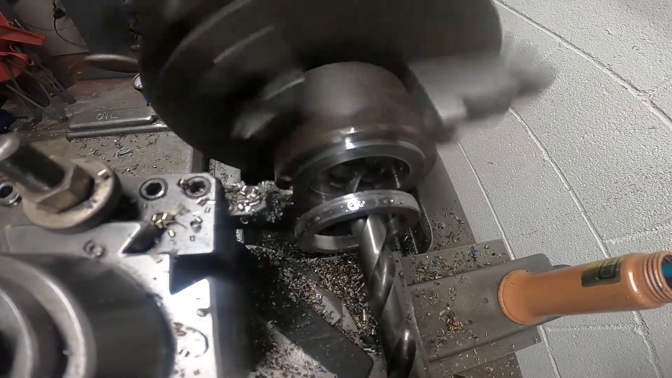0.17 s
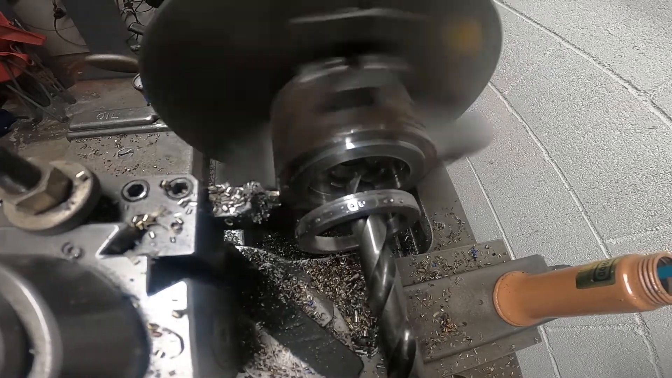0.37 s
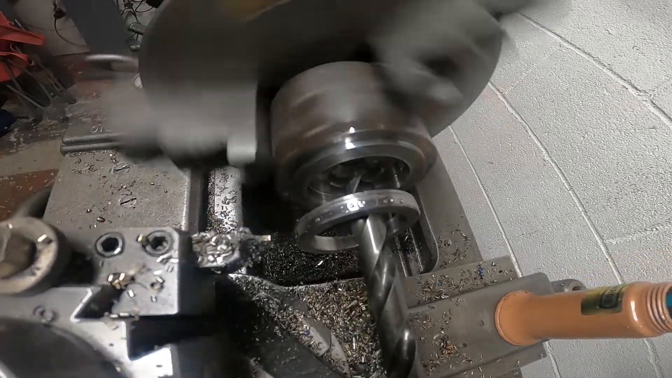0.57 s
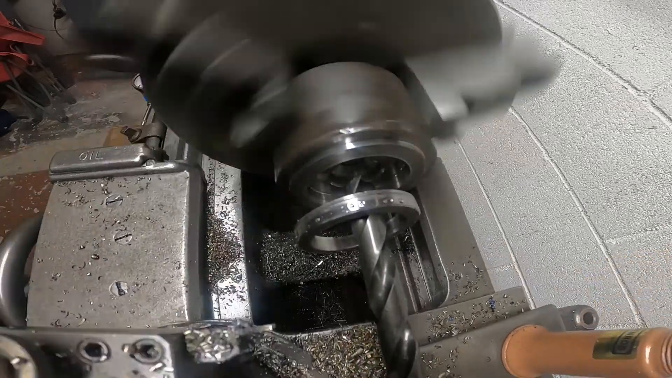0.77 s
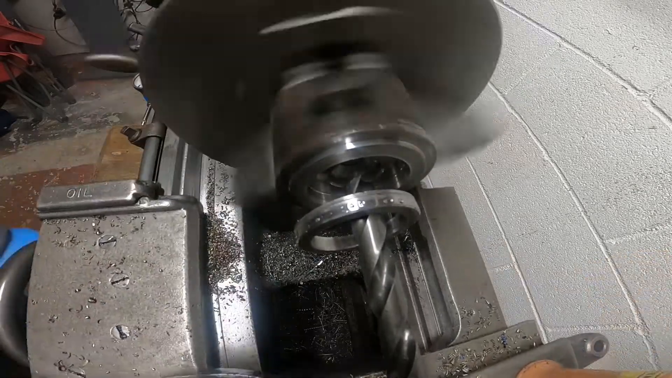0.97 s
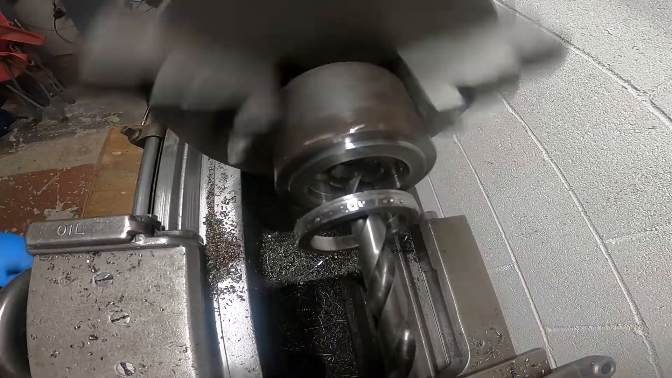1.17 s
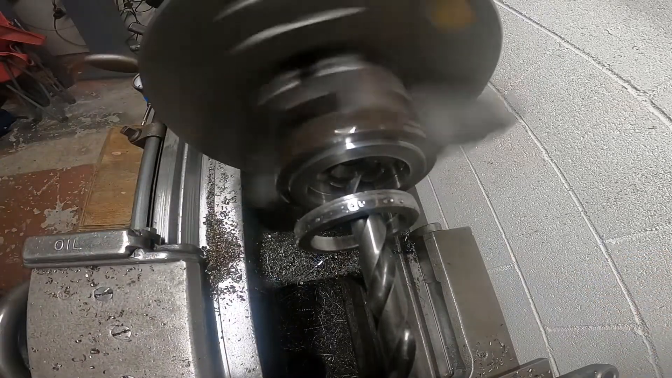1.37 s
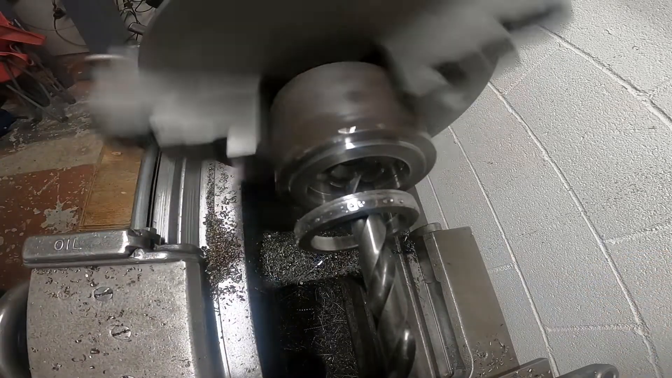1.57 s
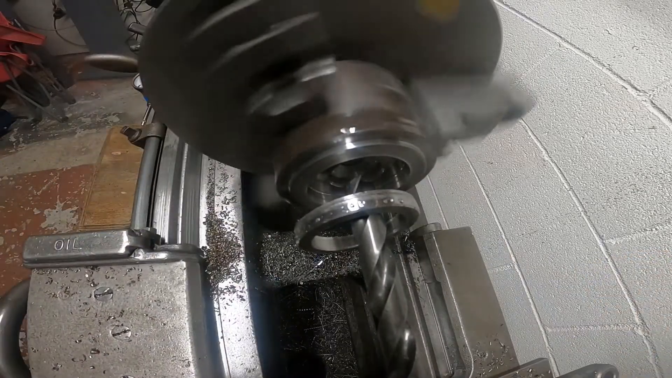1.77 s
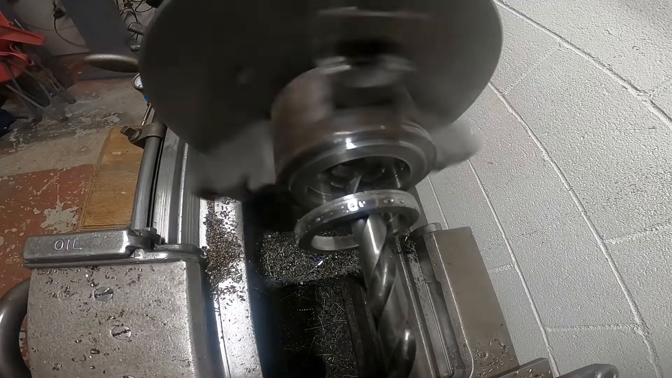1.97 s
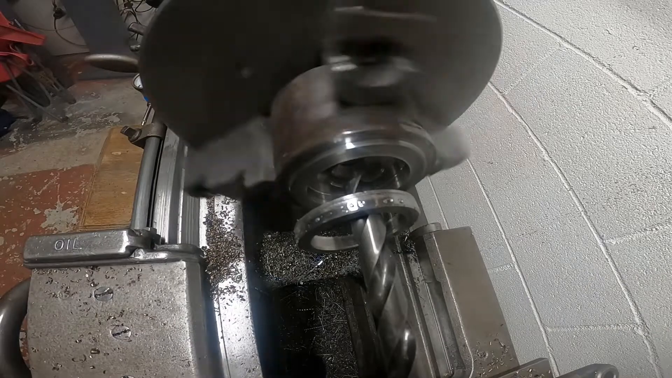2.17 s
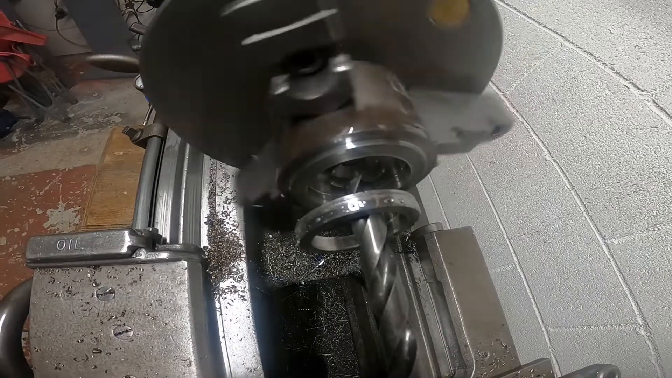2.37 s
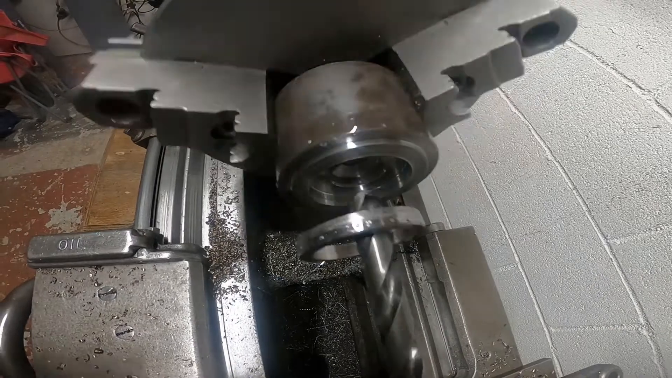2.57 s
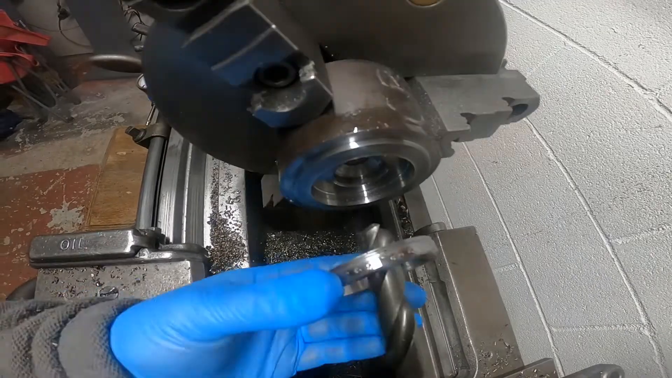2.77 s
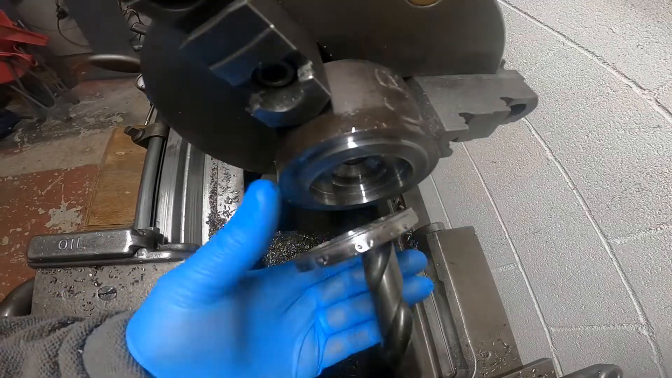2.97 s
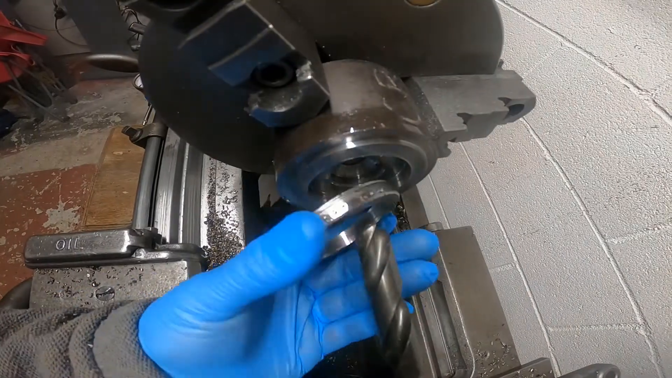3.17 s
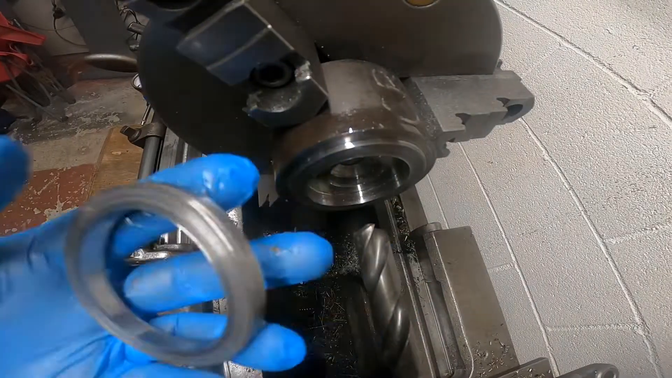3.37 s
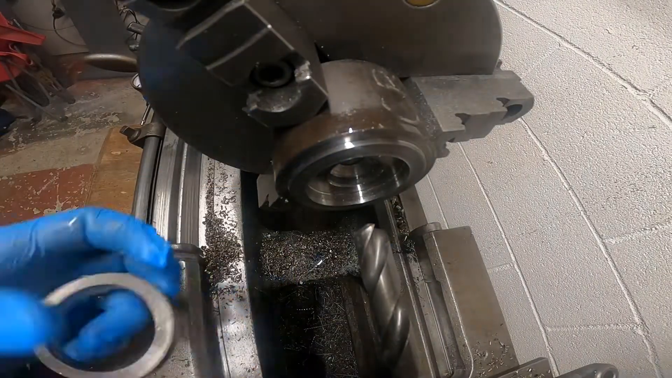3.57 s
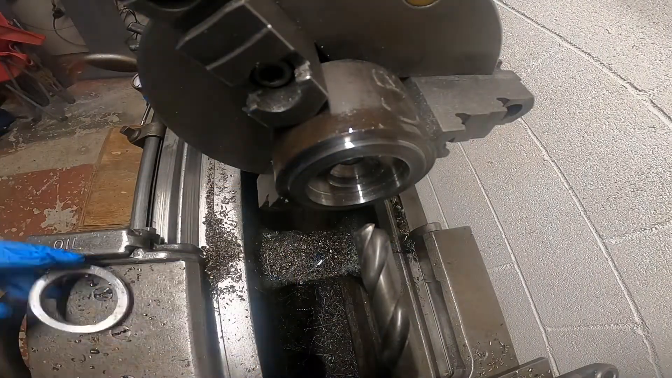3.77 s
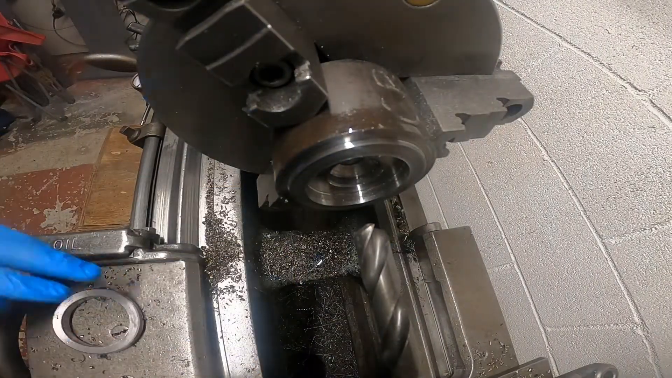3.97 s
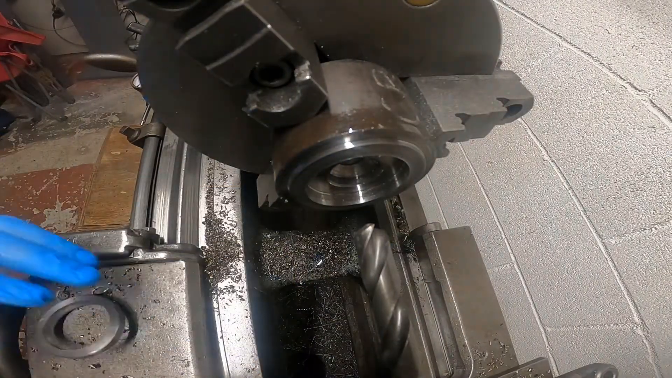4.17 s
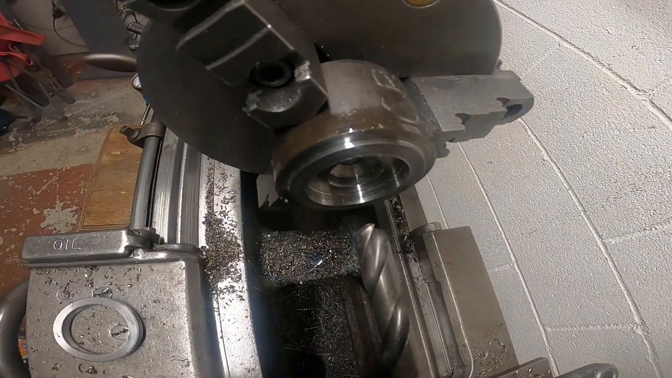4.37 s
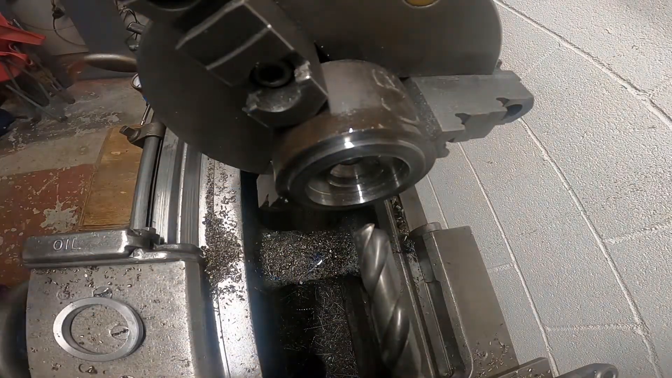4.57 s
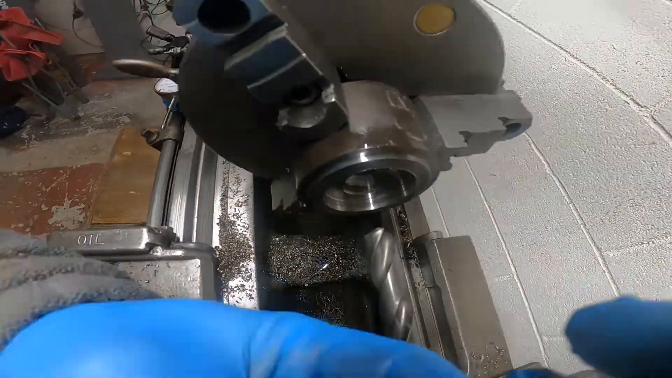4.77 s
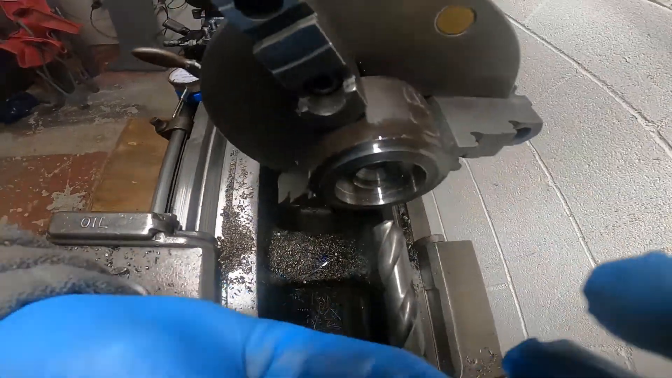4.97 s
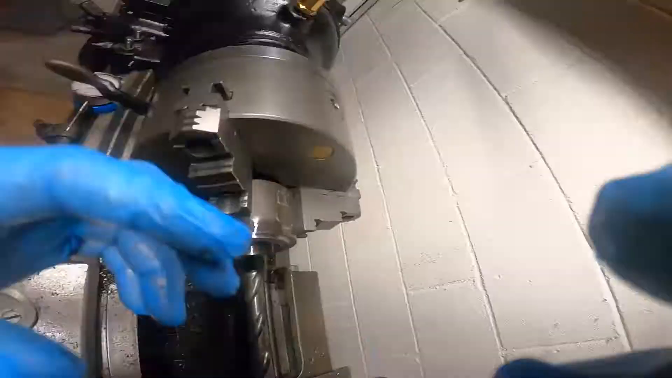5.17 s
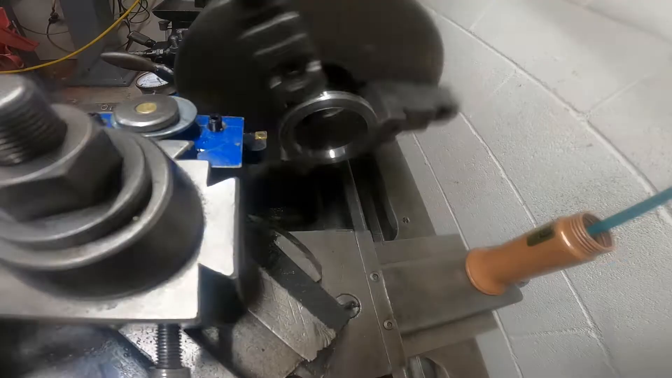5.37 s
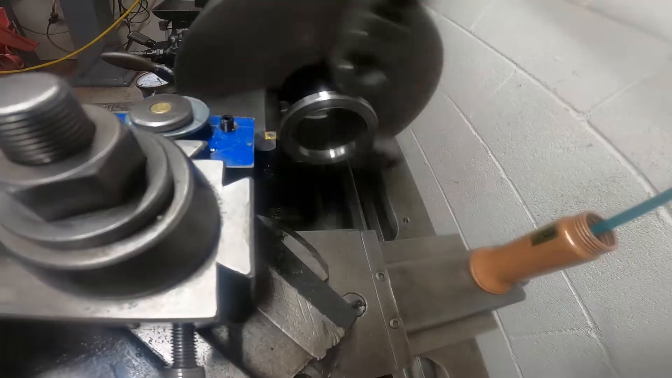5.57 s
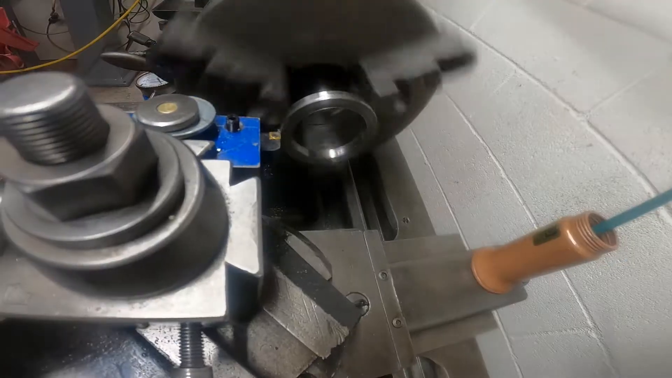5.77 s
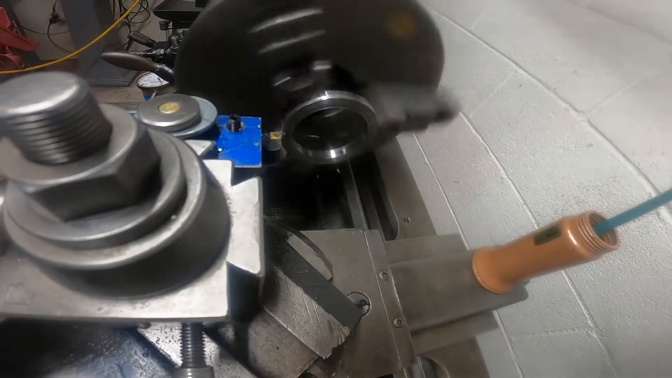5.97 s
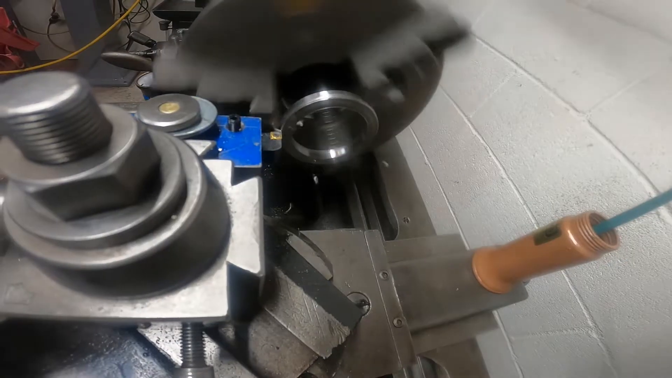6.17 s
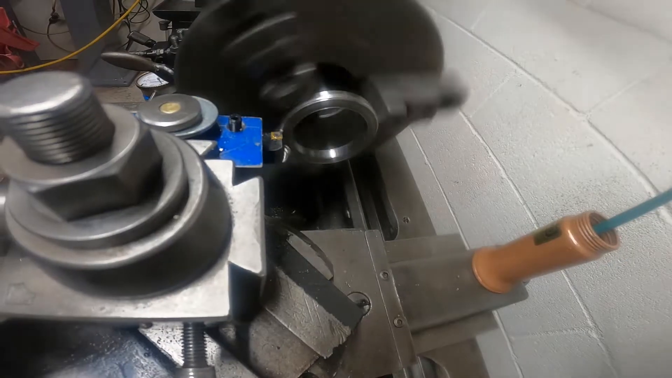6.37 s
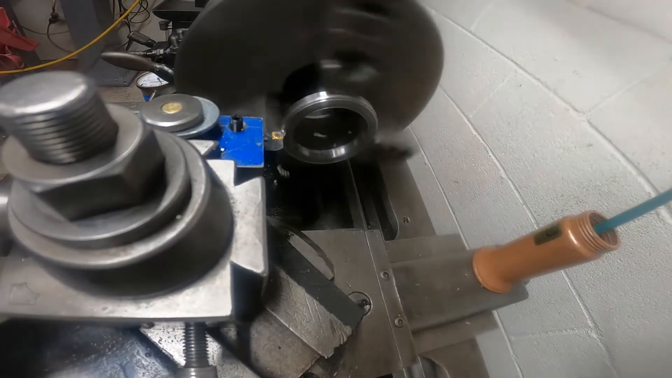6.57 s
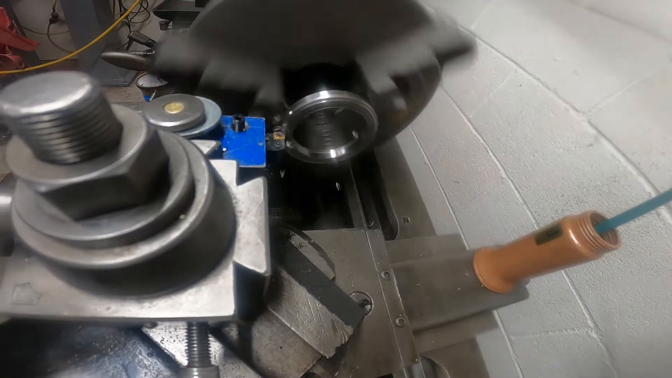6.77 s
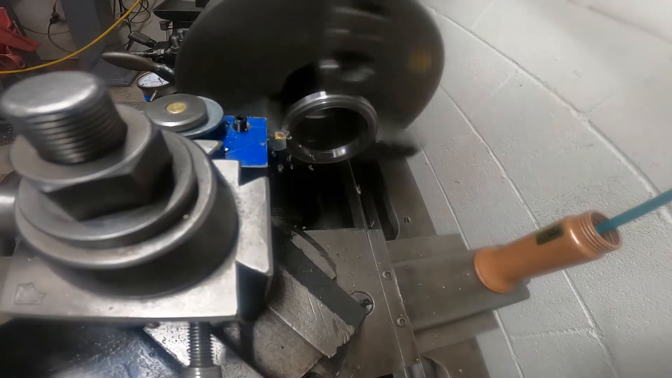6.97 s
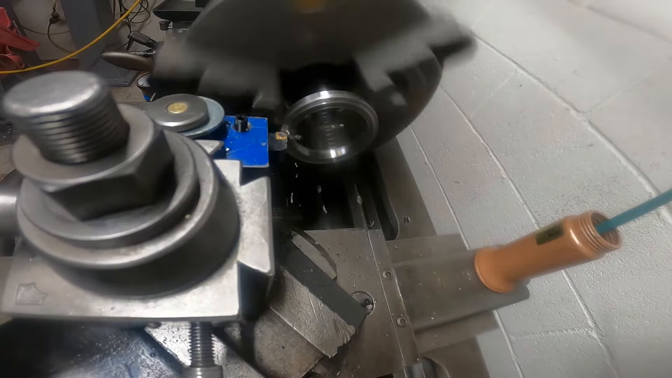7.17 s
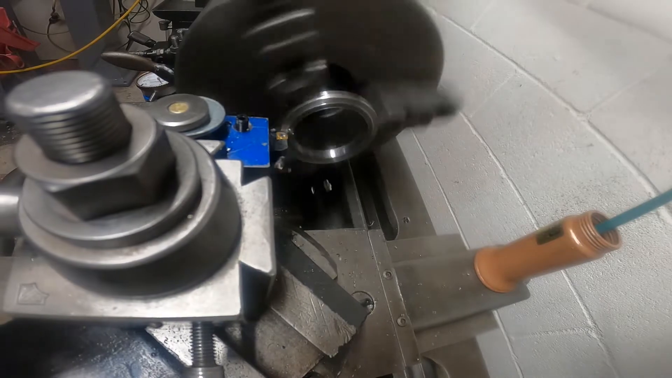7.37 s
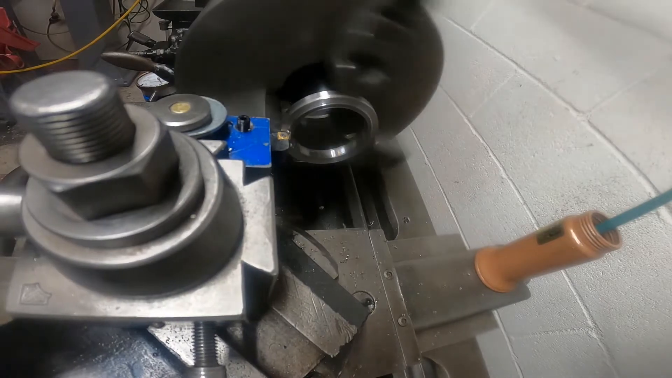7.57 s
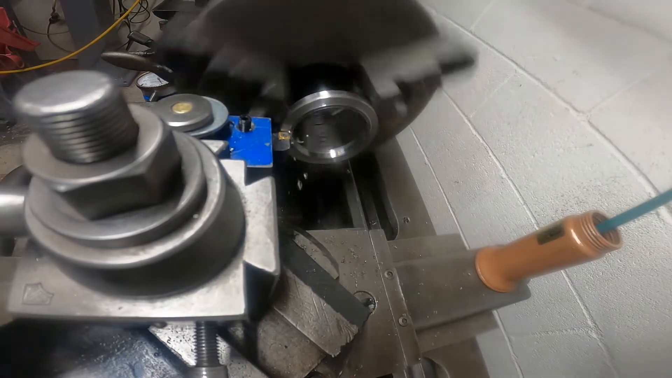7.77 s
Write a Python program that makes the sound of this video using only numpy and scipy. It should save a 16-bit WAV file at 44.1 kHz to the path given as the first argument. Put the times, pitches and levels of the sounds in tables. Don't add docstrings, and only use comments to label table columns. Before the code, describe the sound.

Close in a hard-walled workshop, a small metal lathe runs with a piercing motor whine, gear knocking and brushy hiss. It brakes in a fast falling glide to rattling slow gears as a steel ring drops. A faint motor sings and dies while gloves rustle and the ring clacks down. Hands thump the camera body, then the lathe jolts back up to speed and cuts with hissing chips.

```python
import sys
import numpy as np
from scipy import signal
from scipy.fft import rfft, irfft
from scipy.io import wavfile
from scipy.ndimage import uniform_filter1d

SR = 44100
rng = np.random.default_rng(int(sys.argv[2]) if len(sys.argv) > 2 else 0)


def dump_mix(stems):
    frames = np.atleast_2d(stems).T
    limited = np.clip(frames, -1, 1)
    pcm = np.round(limited * 32767).astype(np.int16)
    wavfile.write(sys.argv[1], SR, pcm)


def rack_gain(trim_db):
    fader = np.asarray(trim_db, float)
    return 10 ** (fader / 20)


N = 344421
T = np.arange(N) / SR

TOOTH_HZ, SHAFT_HZ = 79.45, 18.5
SLOT_HZ, ROTOR_HZ = 1771, 59.03
REACH_S = 4.59


def unit(x):
    return x / np.sqrt(np.mean(x ** 2) + 1e-20)


def along(points, hz):
    f, v = np.transpose(points)
    return np.interp(np.log(hz + 1), np.log(f + 1), v)


def curves(rows):
    s, *cols = np.transpose(rows)
    return [np.interp(T, s, c) for c in cols]


def during(t0, t1, fade):
    return np.clip(np.minimum(T - t0, t1 - T) / fade, 0, 1)


def wobble(rate, size=N):
    knots = rng.standard_normal(int(size * rate / SR) + 2)
    return np.interp(T[:size] * rate, np.arange(len(knots)), knots)


def resonances(modes, floor_db):
    lo, hi = modes[0][0] * 0.83, modes[-1][0] * 0.86

    def gain(f):
        floor = rack_gain(2 * floor_db) * f ** 12 / (f ** 12 + lo ** 12) / (1 + (f / hi) ** 6)
        peaks = sum(rack_gain(2 * db) / (1 + (2 * (f - c) / w) ** 2) ** 2 for c, w, db in modes)
        low_cut = f ** 4 / (f ** 4 + (0.26 * lo) ** 4)
        return low_cut * np.sqrt(floor + peaks)

    return gain


def shaped(points):
    return lambda hz: rack_gain(along(points, hz)) * np.clip(4 * hz / points[0][0], 0, 1) ** 2


def rush(gain, wide_db, patchy_db, size=N):
    hz, _, z = signal.stft(rng.standard_normal((2, size)), SR, nperseg=2048)
    field = uniform_filter1d(uniform_filter1d(rng.standard_normal(z.shape[1:]), 12, 0), 3, 1)
    z = z * rack_gain(patchy_db * unit(field)) * gain(hz)[:, None]
    tied = (np.clip(hz / 4000, 0, 1) * 0.34)[:, None]
    side = np.sqrt(1 - tied ** 2) * z[1] + tied * np.exp(-1.2j) * z[0]
    z[1] = side * rack_gain(along(wide_db, hz))[:, None]
    mid, side = signal.istft(z, SR, nperseg=2048)[1][:, :size]
    return np.array([mid + side, mid - side]) / np.std(mid)


def tone(turns, db, unsteady_db, lead):
    phase = 2 * np.pi * (turns + rng.random())
    level = rack_gain(db + unsteady_db * wobble(34.96, len(turns)))
    return np.sqrt(2) * level * np.sin([phase + lead, phase - lead])


def add(out, s, sound, pan_db):
    at = round(s * SR)
    panned = sound * rack_gain([[pan_db / 2], [-pan_db / 2]])
    out[:, at:at + sound.shape[-1]] += panned[:, :N - at]


def gear_tones(run, turns):
    # (tooth multiple, shaft turns off it, first run level [dB], second run level [dB])
    mesh = [(1, -0.8, -54, -62), (2, -1.05, -63, -56.5), (2, 0.7, -58.5, -57), (3, -0.2, -53.5, -79),
            (4, 0, -46, -47.5), (5, -1, -33, -33), (5, 0, -35, -35), (6, -1, -41, -39.5),
            (6, -0.14, -38.5, -48.5), (6, 0.36, -51, -39), (7, -0.9, -64.5, -45.5), (7, 0.1, -45, -50),
            (8, 0, -43, -41.5), (9, 0.7, -42.5, -60), (10, 0.2, -47.5, -59), (11, -3, -51, -61),
            (11, -0.2, -57, -44)]
    return sum(tone((k * TOOTH_HZ + off * SHAFT_HZ) * turns, db[run], 2.3, 0.017) for k, off, *db in mesh)


def motor_whine(run, turns, speed):
    # (frequency [Hz], level [dB])
    orders = [
        [(1523, -36), (1588, -38.5), (1712, -36.5), (1771, -29.5), (2374, -43.5), (2751, -41), (3128, -36.5), (3295, -46), (3418, -39.5), (3666, -33.5), (3908, -42), (4393, -35), (4689, -35), (5254, -37.5), (5313, -31), (5491, -43), (7084, -39)],
        [(1254, -41), (1523, -43), (1583, -39.5), (1701, -40), (1766, -38.5), (2126, -44), (2336, -44), (3117, -41), (3284, -52), (3408, -62), (3467, -50), (3531, -35.5), (3591, -47), (3957, -60), (4377, -34), (4775, -54), (5114, -43), (5173, -48), (5297, -25.5), (5356, -32), (5475, -44), (7063, -32), (7795, -48), (8823, -54)],
    ]
    # (frequency [Hz], gain [dB])
    housing = [(800, 9), (1100, -7), (1250, -7), (1430, -0.5), (1640, 11), (1850, 3), (2150, 8),
               (2500, 5.5), (2850, 1), (3200, -7), (3650, 15), (4150, 2), (4650, -3), (6400, 5),
               (8300, -19)]
    full = speed[(0, -1)[run]]
    drift = np.cumsum(wobble(4.97, len(speed))) / SR * (.0003, .0007)[run]
    out = 0
    for hz, db in orders[run]:
        passed_db = along(housing, hz * speed / full) - along(housing, hz)
        lead = rng.normal(0.14, 0.05)
        out = out + tone(hz * (turns / full + drift), db - 4.0 + passed_db, 1.9, lead)
    return out


def slot_tones(run, turns, speed):
    harmonics = [
        [-34.5, -32, -35, -35.5, -41.5, -45, -47],
        [-33.5, -33, -35.5, -36, -40, -39.5, -40],
    ]
    # (frequency [Hz], gain [dB])
    frame = [
        [(1100, -4), (1400, 3), (1650, 4), (1900, -5), (2200, 0), (2550, -1), (2850, 2), (3150, -7), (3550, 5), (3900, 5), (4300, 3), (4750, 3.5), (5300, -2.5), (5800, 1), (6300, 0), (7000, -5), (8500, -6)],
        [(700, -4), (1100, -2), (1400, -4.5), (1650, 8), (1900, -6), (2200, 6), (2550, 1.5), (2850, 5), (3150, -3), (3550, 5.5), (3900, 1.5), (4300, 0), (4750, .5), (5300, 3), (5800, 2.5), (6300, 3.5), (7000, -5), (8500, -10)],
    ]
    shiver = np.cumsum(wobble(60, len(speed))) / SR * 7.5
    out = 0
    for k in range(1, 8):
        db = harmonics[run][k - 1] + along(frame[run], k * SLOT_HZ * speed)
        out = out + tone(k * (SLOT_HZ * turns + shiver), db, 3.2, 0.18)
    return out * (1 + 0.6 * np.cos(2 * np.pi * ROTOR_HZ * turns))


def bed_ringing(span):
    # (frequency [Hz], level [dB])
    bed_modes = [(1218, -39.5), (1296, -39.5), (1203, -44)]
    size = np.count_nonzero(span)
    out = 0
    for hz, db in bed_modes:
        blur = np.cumsum(wobble(90, size)) / SR * 18
        out = out + tone(hz * T[span] + blur, db + 3 * wobble(10.85, size), 5.2, .03)
    return out * (0.54 * during(1.59, 2.51, 0.14) + .4 * during(-1, 2.51, 0.14))[span]


def machine_noise(run, turns, speed, speed_db, span):
    # (first run level [dB], second run level [dB], law [dB per dB of speed], swell at half speed [dB])
    layers = [
        (-30, -28.5, 2, 5),
        (-26.5, -27.5, 1.27, 7),
        (-23.5, -24.5, 1.6, 4.5),
        (-31, -31, 1.79, 6),
    ]
    # (frequency [Hz], width [Hz], level [dB])
    gearbox, bed = [(361, 42, -15), (374.3, 48.6, -2), (475, 19, -7), (526, 24, -7), (659, 75, -5),
                    (803.5, 69, -4), (895, 31, -8)], [(1086, 23.6, -1.5), (1208, 99, -5), (1277, 59, -3), (1532, 46, -4),
                                     (1650, 65, -11.5), (2100, 32, -8), (2636, 30, -10)]
    # (frequency [Hz], level [dB])
    brushes, bass = [(1290, -13), (2200, -2), (2580, -8), (3040, -3), (3300, -4), (3610, 2.5), (4110, -1),
                     (5440, -0.5), (5820, -3.5), (7080, -3.5), (9500, -33), (12400, -52.5), (20900, -120)], [(15, -60), (25, -36.5), (65, -9), (107, -30), (145, -1.5), (199, -30),
                                      (330, -9)]
    chips = [
        [(4410, -35), (7500, 0), (8570, 2), (10000, -1.5), (12600, -0.5), (14600, -5), (15700, -8)],
        [(4410, -22), (7500, 2.5), (9230, 2), (10700, 5.5), (14400, 0.5), (15700, -3)],
    ]
    # (frequency [Hz], side over mid [dB])
    wide = [(60, -28), (110, 4.5), (200, -2.5), (380, -26.5), (700, -13), (1290, -65), (2380, -10.5),
            (4400, -7.5), (8120, -6.5), (15000, -5.5)]
    size = len(speed)
    gear_db, bed_db, brush_db, chip_db = (
        db[run] + law * speed_db + swell_db * 4 * speed * (1 - speed) for *db, law, swell_db in layers)
    gear_db = gear_db + 26.5 * np.exp(-((speed - 0.037) / 0.25) ** 2)
    chip_db = chip_db + 5.5 * during(5.79, 9, 0.62)[span]
    teeth = np.cos(2 * np.pi * TOOTH_HZ * turns)
    shaft = np.cos(2 * np.pi * SHAFT_HZ * turns)
    knocks = (1 + .5 * teeth) * (1 + 0.051 * shaft)
    noise = rack_gain(gear_db - 3.5) * knocks * rush(resonances(gearbox, -19.5), wide, 1.0, size)
    noise += rack_gain(bed_db - 3.5) * (1 + 0.023 * teeth) * rush(resonances(bed, -14.0), wide, 1.94, size)
    noise += rack_gain(brush_db - 2.5) * rush(shaped(brushes), wide, 2.3, size)
    chip_level = rack_gain(chip_db + 0.85 * wobble(59.0, size))
    noise += chip_level * rush(shaped(chips[run]), wide, 1.24, size) * rack_gain([[.2], [-.2]])
    rumble = rush(lambda hz: rack_gain(along(bass, hz)) * (hz < 300), wide, 1.5, size)
    return noise + rack_gain((-52, -54)[run]) * speed ** 8 * rumble


def lathe():
    # (time [s], share of full speed)
    drive = [
        (0, 1.0),
        (1.42, 1.0),
        (1.54, .915),
        (1.66, .814),
        (2.81, .0),
        (5.43, .0),
        (5.432, .427),
        (6.144, .997),
        (7.81, .997),
    ]
    # (start [s], end [s], fade [s])
    runs = [
        (-1, 3.0, .02),
        (5.432, 9, .035),
    ]
    # (start [s], end [s])
    ramps = [
        (1.4, 2.6),
        (5.4, 6.15),
    ]
    out = np.zeros((2, N))
    for run, (t0, t1, fade) in enumerate(runs):
        span = (T > t0) & (T < t1)
        speed = curves(drive)[0][span]
        turns = np.cumsum(speed) / SR
        speed_db = 20 * np.log10(speed + 0.024)
        ramp = during(*ramps[run], 0.036)[span]
        load = ramp * rack_gain((1.6, 1.1)[run] * speed_db)
        sound = machine_noise(run, turns, speed, speed_db, span)
        sound += gear_tones(run, turns) * speed ** 10
        whine_level = speed ** 1.5 * (1 - 0.85 * ramp) * (1 - .35 * during(1.09, 2.6, .1)[span])
        sound += motor_whine(run, turns, speed) * whine_level
        sound += slot_tones(run, turns, speed) * load
        eased = (0.36 * during(-1, 1.42, .05) + 0.7 * during(1.11, 1.46, 0.076))[span]
        sound += tone(2 * SLOT_HZ * turns, -29.5, 1.2, .15) * eased
        sound += bed_ringing(span)
        out[:, span] = sound * during(t0, t1, fade)[span]
    return out


def scrape(db, hz, knock_db, length, click, ring, bright, sharp=5, low_hz=2300, order=1):
    t = np.arange(int(.14 * SR)) / SR
    length = np.clip(length, .002, .06)
    shape = (1 - np.exp(-t / (0.16 * length))) * np.exp(-t / (13.0 * length)) / (1 + (t / length) ** 4)
    grit = rack_gain(5 * np.repeat(rng.standard_normal(len(t) // 40 + 1), 40)[:len(t)])
    white = rng.standard_normal((2, len(t))) * 0.54 + rng.standard_normal(len(t))
    b, a = signal.butter(order, [low_hz, np.clip(bright, 3200, 20000)], "bandpass", fs=SR)
    hiss = unit(signal.lfilter(b, a, white)) * 0.54
    snap = hiss * rack_gain(-60 * abs(t - .002) / .0013)
    b, a = signal.iirpeak(hz, sharp, fs=SR)
    ringing = ring * unit(signal.lfilter(b, a, white))
    b, a = signal.butter(2, [450, 1500], "bandpass", fs=SR)
    dull = unit(signal.lfilter(b, a, rng.standard_normal(len(t))))
    knock_decay = rack_gain(knock_db - 60 * t / (0.0072 + 5.8 * length))
    knock = dull * knock_decay * (1 - np.exp(-t / (0.27 * length)))
    return rack_gain(db) * (click * snap / abs(snap).max() + (hiss * grit * 0.44 + ringing) * shape + knock)


def tool_contacts():
    # (time [s], level [dB], knock [dB], length [s])
    leaves = [
        (2.501, -32, 6, 0.0065),
        (2.643, -45.5, 21, 0.021),
    ]
    # (time [s], level [dB], pitch [Hz], gap [s])
    bites = [
        (5.8, -27, 11200, .061),
        (6.825, -27, 7700, .047),
    ]
    drill_hz = 4220
    out = np.zeros((2, N))
    for s, db, knock_db, length in leaves:
        add(out, s, scrape(db, drill_hz, knock_db, length, click=0, ring=1.5, bright=10000), 0)
    for s, db, hz, gap in bites:
        for k in range(3):
            add(out, s + k * gap, scrape(db, hz, -16, 0.014, click=0, ring=1.86, bright=6700), 0)
    return out


def hand_contacts():
    # (time [s], level [dB], knock [dB], length [s])
    touches = [(2.983, -31, -38, 0.0074), (3.138, -30.5, -18, 0.006), (3.203, -39, -25, 0.012),
               (3.354, -50, -18, 0.0044), (3.495, -38, -37, .03), (3.656, -42, -35, 0.012),
               (3.424, -42, -38, .012), (3.527, -26.5, -27, 0.027), (3.675, -28, -20, 0.012),
               (3.677, -21, -17, 0.018), (3.681, -28.5, -40, .005), (3.693, -39, -6, 0.0096),
               (3.732, -41, -13, 0.021), (3.79, -15.5, -33, 0.0065), (3.801, -24, -43, 0.0086),
               (3.813, -30, -18.5, 0.016), (3.844, -35, -34, 0.019), (4.012, -41, -31, 0.012),
               (4.02, -41.5, -31, 0.0068), (4.206, -32, -27, 0.01), (4.207, -28, -18, 0.0081),
               (4.216, -27, -22, 0.0055), (4.218, -28.5, -16.5, 0.018), (4.251, -32, -18, 0.012),
               (4.271, -27, -20, 0.011), (4.284, -37, -14, 0.023), (4.301, -41, -35, .009),
               (4.492, -46, -37, 0.0086), (4.528, -29, -21, 0.013), (4.617, -31, -17.5, 0.02),
               (4.686, -22.5, -18.5, 0.028)]
    # (time [s], level [dB], pitch [Hz], length [s])
    dabs = [(2.827, -48, 2500, 0.072), (2.85, -50, 4100, .03), (2.923, -49, 2000, 0.024),
            (2.647, -37, 1600, .016), (2.669, -43, 450, .06), (2.984, -44, 3600, 0.0092),
            (3.146, -45, 2800, .012), (3.196, -40.5, 4080, 0.019), (3.199, -45, 1800, .015),
            (3.35, -51, 5500, .008), (3.577, -51, 11000, 0.034), (3.875, -47, 4600, 0.012),
            (4.582, -51, 8000, .008), (5.244, -41, 10500, .014)]
    # (time [s], length [s], start pitch [Hz], end pitch [Hz], level [dB])
    squeaks = [
        (3.49, .06, 150, 130, -68),
        (3.69, .025, 900, 860, -52),
        (3.2, .03, 700, 690, -60),
        (4.04, .055, 2500, 2500, -58),
        (4.05, .05, 5000, 5000, -60),
        (3.8, .035, 820, 800, -55),
        (3.323, .056, 1730, 1540, -52),
        (5.159, .011, 4700, 5000, -36),
        (5.171, .015, 3400, 3200, -39),
        (4.988, .01, 3400, 3300, -45),
    ]
    out = np.zeros((2, N))
    for s, db, knock_db, length in touches:
        hz = np.clip(630 * 2 ** (-knock_db / 5.5), 2000, 13000)
        snap = (.021 / length) ** 1.5
        add(out, s, scrape(db - 5.5, hz, knock_db, length, click=snap, ring=0.27, bright=23500,
                           sharp=1.2, low_hz=hz * 0.41, order=2), 1.5)
    for s, db, hz, length in dabs:
        add(out, s, scrape(db, hz, -30.0, length, click=0, ring=0.63, bright=hz * 1.2,
                           sharp=4.3, low_hz=hz * 0.53, order=2), .5)
    for s, length, from_hz, to_hz, db in squeaks:
        size = round(length * SR)
        glide = np.linspace(from_hz, to_hz, size) / SR
        turns = np.cumsum(glide + .0015 * wobble(900, size))
        add(out, s, tone(turns, db, 2.5, .2) * during(0, length, .2 * length)[:size], 0)
    return out


def camera_bumps():
    # (time [s], crack [dB], thump [dB], thump pitch [Hz], length [s])
    bumps = [(4.736, -50, -22.5, 293, 0.015), (4.801, -45, -30, 420, 0.015), (4.827, -52, -50, 200, .003),
             (4.837, -52, -50, 200, .002), (4.844, -52, -50, 200, .003), (4.871, -44, -27, 180, 0.004),
             (4.887, -48, -25, 190, 0.004), (4.898, -50, -40, 200, .003), (4.915, -41, -42, 300, 0.006),
             (4.929, -42, -45, 300, .006), (4.969, -51, -45, 200, .004), (4.9349, -20.5, -37, 400, 0.0018),
             (4.936, -11.5, -12.5, 194, 0.0018), (4.954, -64, -24, 190, .0045),
             (4.978, -40, -43, 150, 0.0079), (4.99, -33.5, -23, 218, 0.0061), (5.064, -55, -28, 200, .0045),
             (5.077, -17.5, -10.5, 151, 0.0038), (5.115, -40, -38, 230, 0.038),
             (5.138, -50, -20, 302, .006), (5.158, -29.5, -38, 300, 0.021), (5.16, -37, -15.5, 453, 0.0069),
             (5.169, -12, -12.5, 210, 0.002), (5.181, -45, -36, 300, .004), (5.246, -60, -43, 90, 0.0071),
             (5.277, -58, -28, 162, .02), (5.303, -39.5, -38, 420, 0.023), (5.32, -36, -45, 400, .003),
             (5.374, -33.5, -32, 389, 0.0044), (5.383, -41, -34, 422, 0.0056)]
    out = np.zeros((2, N))
    t = np.arange(int(.12 * SR)) / SR
    for s, crack_db, thump_db, hz, length in bumps:
        pan_db = 12 + 0.12 * (thump_db + 8)
        port_hz = np.clip(hz, 90, 500) * np.array([[.95], [1.15]])
        swing = np.sin(2 * np.pi * port_hz * t + rng.random((2, 1)) * 2.1)
        thump = swing * np.exp(-t * port_hz / 0.63) * (1 - np.exp(-t * port_hz / 0.088))
        add(out, s + 0.00216, rack_gain(thump_db + 6.5) * thump, pan_db - 7.0)
        bright = 20000 * rack_gain(0.39 * (crack_db + 17))
        add(out, s, scrape(crack_db, 3250, -6.5, length, click=2.4, ring=0.38, bright=bright), pan_db - 13.0)
    return out


def camera_rubbing():
    # (time [s], length [s], level [dB], left over right [dB])
    squeezes = [(4.728, 0.047, -30.5, -5), (4.791, 0.037, -30, 3), (4.842, 0.029, -41, 9),
                (4.867, 0.04, -32, 2), (4.902, 0.045, -34.5, 4), (4.952, 0.038, -42, 2),
                (4.97, 0.068, -39.5, 5), (5.03, 0.059, -42, 4), (5.07, 0.022, -25.5, 13),
                (5.097, 0.056, -29, 1), (5.146, 0.046, -31, 1), (5.268, 0.026, -54, -2),
                (5.303, 0.038, -51, 3)]
    # (time [s], length [s], level [dB])
    strokes = [
        (4.692, 0.17, -50.5),
        (4.968, 0.069, -61),
        (5.11, 0.056, -53),
        (5.147, 0.077, -45.5),
        (5.238, 0.166, -44.5),
    ]
    # (frequency [Hz], level [dB per Hz])
    shell, skin = [(25, -3), (60, 1.5), (180, 1.5), (400, -7), (1200, -19), (3000, -38.5)], [(200, -5), (500, 4.5), (1500, -11.5), (4000, -15.5), (9000, -11),
                                 (15700, -16)]
    grip = rack_gain(-58)
    for s, length, db, lean_db in squeezes:
        ports = rack_gain(db + np.array([[lean_db], [-lean_db]]) / 2)
        grip = grip + ports * during(s, s + length, 0.36 * length)
    slide = rack_gain(-86.0) + sum(rack_gain(db) * during(s, s + length, 0.018) for s, length, db in strokes)
    lumps = rack_gain(2.5 * np.array([wobble(45), wobble(45)]))
    out = grip * unit(lumps * rush(shaped(shell), [(100, -.6)], 1.5))
    out += slide * rack_gain(4 * wobble(80)) * rush(shaped(skin), [(1000, -26)], 2.2)
    return out * during(4.722, 5.428, 0.015)


def mount_creaks():
    # (time [s], slips, rate [slips a second], level [dB])
    creaks = [
        (5.362, 4, 330, -34),
        (5.374, 5, 385, -23),
        (5.3915, 3, 370, -21),
    ]
    # (frequency [Hz], level [dB], time to fall 60 dB [s])
    plastic = [(766, -2, 0.004), (1470, -5, 0.0026), (3680, -18.5, 0.0057)]
    out, t = np.zeros((2, N)), T[:SR // 50]
    for s, slips, rate, db in creaks:
        for k in range(slips):
            ring = 0
            for hz, level, t60 in plastic:
                decay = rack_gain(level + rng.normal(0, 3.8) - 60 * t / t60)
                ring = ring + decay * np.sin(-2 * np.pi * hz * t)
            add(out, s + k / rate, rack_gain(db + 7.0) * ring * (1 - np.exp(-t / 0.00023)), -1.5)
    return out


def feed_motor():
    # (time [s], base pitch [Hz], level [dB])
    rundown = [
        (2.55, 1480.5, -90),
        (2.72, 1480.5, -61),
        (3.31, 1480.5, -61),
        (3.36, 1270, -67),
        (3.432, 1020, -70),
        (3.56, 850, -82),
    ]
    # (multiple of the base pitch, level [dB])
    multiples = [(1.06, -6), (1.148, -8), (1.682, -8), (1.972, -6), (2.5, -7), (3.215, -10), (3.397, -6),
                 (3.755, -11), (4, 1), (5, 1), (6, -10), (7, -3), (7.485, -10)]
    hz, db = curves(rundown)
    span = (T > rundown[0][0]) & (T < rundown[-1][0])
    turns = np.cumsum(hz[span]) / SR
    out = np.zeros((2, N))
    out[:, span] = sum(tone(k * turns, db[span] + level, 2.8, 0.13) for k, level in multiples)
    return out


def bed_shudder():
    # (frequency [Hz], level [dB per Hz])
    shudder = [(30, -14), (50, 5), (90, -7), (160, -8.5), (300, -13), (500, -3), (900, -30)]
    level = rack_gain(-46.5 + 3.2 * wobble(24.83)) * during(2.335, 2.915, 0.31)
    return level * rush(shaped(shudder), [(100, 2.9)], 2.6)


def background_dips():
    # (start [s], end [s], change [dB])
    still = [
        (3.657, 3.676, -13),
        (3.898, 3.972, -16),
        (4.122, 4.196, -10.5),
        (4.495, 4.526, -17),
    ]
    return sum(db * during(t0, t1, 0.0074) for t0, t1, db in still)


def gloves(dip_db):
    # (time [s], glove motion [dB])
    motion = [
        (2.85, -51.5),
        (3.18, -51.5),
        (3.5, -55.5),
        (3.7, -65.5),
        (4.0, -63.5),
        (4.09, -55.5),
        (4.33, -61.5),
        (4.44, -55),
        (4.56, -63),
    ]
    # (frequency [Hz], level [dB])
    cloth = [(880, -36), (1500, -6), (2050, -12.5), (2520, -3.5), (2950, -6.5), (3270, -24), (3650, -11),
             (4290, -8.5), (4970, -4), (6300, -7), (7890, -8), (10700, -10.5), (13400, -10)]
    glove_db = curves(motion)[0] + 12 * during(REACH_S, 9, 0.14)
    level = rack_gain(glove_db + dip_db + 2.4 * wobble(70))
    return level * rush(shaped(cloth), [(3000, -4)], 1.5) * during(0.7, 4.74, 0.011)


def room_and_hum(dip_db):
    # (frequency [Hz], level [dB])
    murmur = [(35, -44), (60, -10), (395, -11), (473, -8.5), (534, -6), (877, 0.5), (1490, -11.5),
              (2200, -15), (2860, -43), (4840, -120)]
    # (frequency [Hz], start [s], end [s], level [dB])
    hums = [
        (479.1, 2.6, 4.74, -77),
        (893.6, 2.6, 4.74, -80),
        (48.5, 2.35, 3.0, -63.5),
    ]
    lift_db = 6 * np.maximum(during(0, 3.65, 0.11), during(REACH_S, 9, 0.06))
    level = rack_gain(-68.5 + lift_db + .3 * dip_db + 2.2 * wobble(60))
    room = level * rush(shaped(murmur), [(800, -5)], 2.4) * during(0.7, 4.74, 0.011)
    hum = sum(tone(hz * T, db, 0.55, 0.077) * during(t0, t1, 0.1) for hz, t0, t1, db in hums)
    return room + hum * rack_gain(lift_db)


def scene():
    dip_db = background_dips()
    machine = lathe() + tool_contacts()
    hands = hand_contacts() + camera_bumps() + camera_rubbing() + mount_creaks()
    quiet = feed_motor() + bed_shudder() + gloves(dip_db) + room_and_hum(dip_db)
    return machine + hands + quiet


def top_cut(x):
    return signal.sosfilt(signal.butter(12, 16860, fs=SR, output="sos"), x)


def record(dry):
    hz = np.fft.rfftfreq(N, 1 / SR)
    # (frequency [Hz], gain [dB])
    top_fall = [(15750, 0), (15950, -22), (16700, -26), (16900, -90)]
    wet = irfft(rfft(dry) * rack_gain(along(top_fall, hz)), N)
    return top_cut(wet)


dry = scene()
out = record(dry)
dump_mix(out)
```